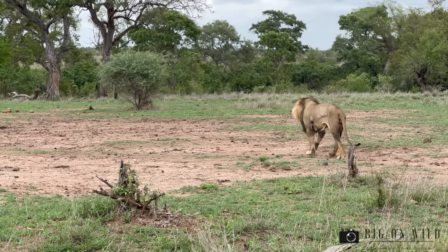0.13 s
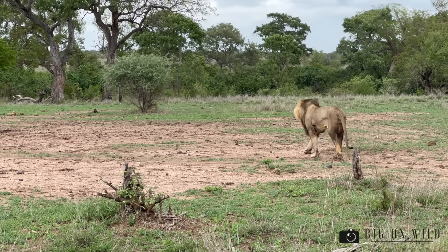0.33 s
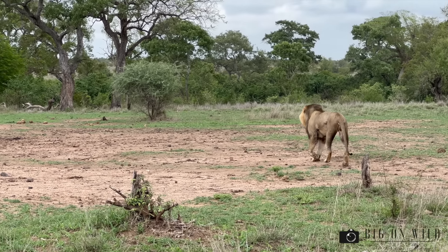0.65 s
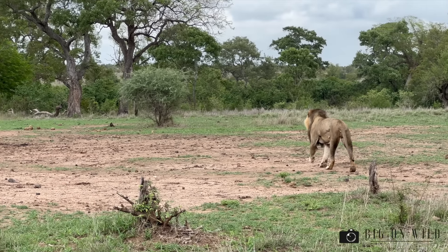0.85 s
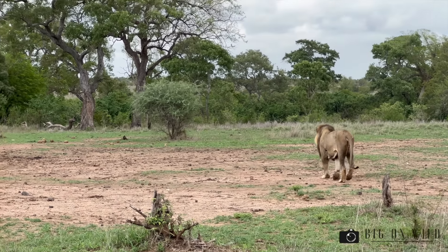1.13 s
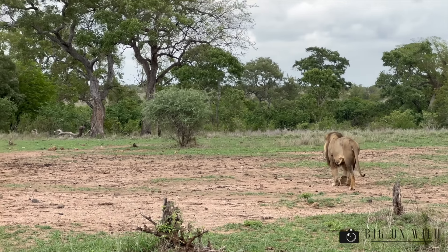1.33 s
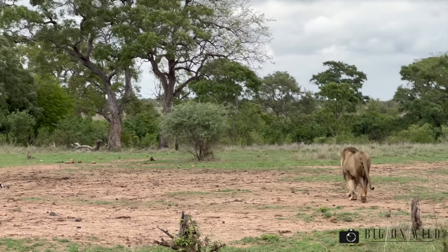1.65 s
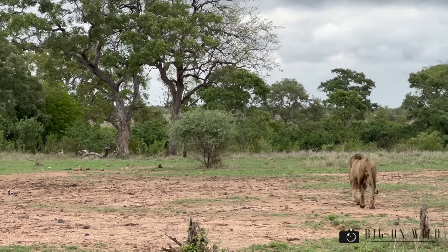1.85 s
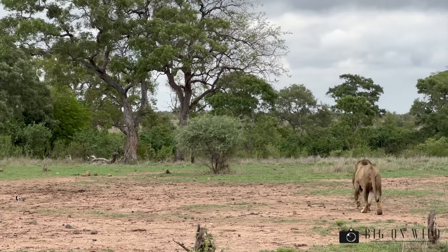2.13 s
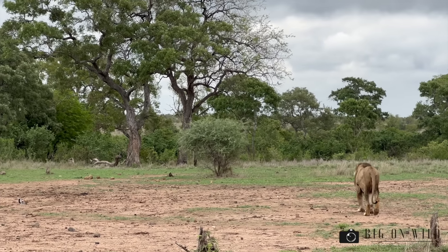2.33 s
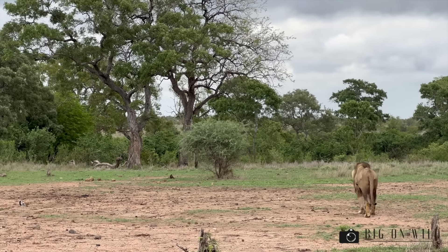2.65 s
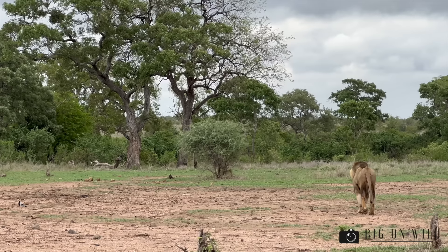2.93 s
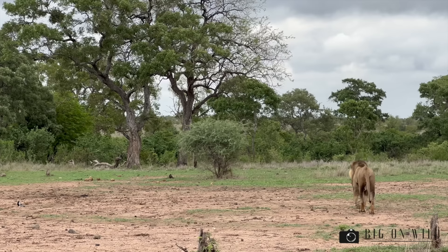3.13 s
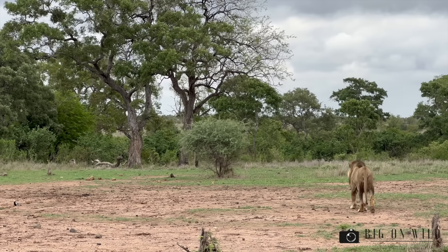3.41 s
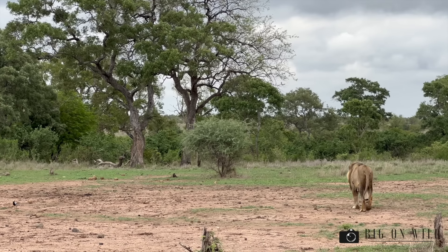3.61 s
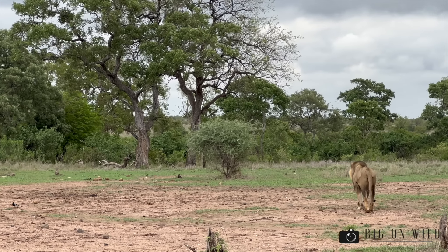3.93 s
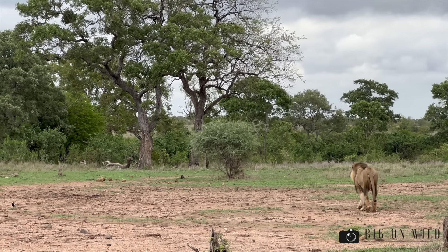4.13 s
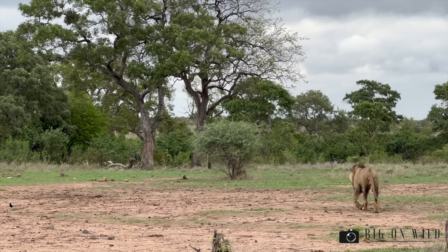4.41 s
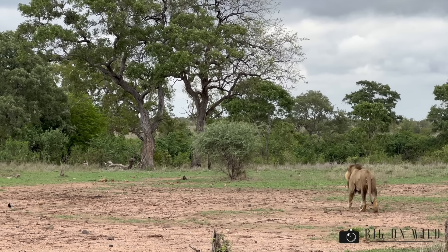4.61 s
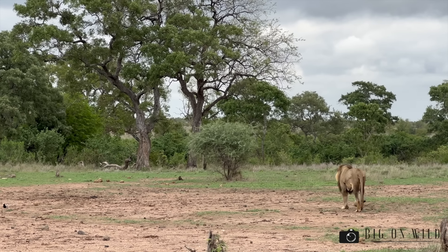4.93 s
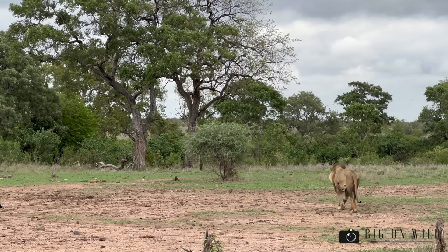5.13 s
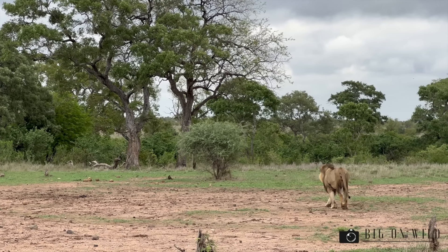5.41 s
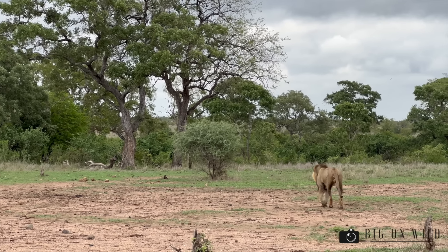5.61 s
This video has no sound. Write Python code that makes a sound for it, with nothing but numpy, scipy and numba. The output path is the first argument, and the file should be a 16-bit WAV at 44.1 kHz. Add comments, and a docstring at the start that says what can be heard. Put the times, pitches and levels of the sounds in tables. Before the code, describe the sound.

Outdoors in still bushland, a lion's heavy moan opens and drops into torn, fluttering growl. Small birds pipe, slur and scratch softly around the gap. Another long roar climbs, catches, rings deep and full, then crumbles. Three brief, hoarse, chesty grunts come with quiet spaces between. The stereo pickup is clean, the lion slightly left, birds slightly right, with a faint spread-out return from the trees.

```python
"""Lion roaring over the bush

A male lion gives two long roars, then three short grunts, in open bush country.
Each roar swells into a nearly pure deep tone, falls in pitch and breaks into a ragged growl.
Locked vocal folds give sines; loose folds give uneven clicks and torn noise, rung through throat and mouth.
Small birds, made of gliding sines and harsh stacks of partials, sing in and around the pause.
Filtered noise makes the quiet air; decaying noise and a few delays make the faint echo from the trees."""
import sys
import numpy as np
from scipy import signal
from scipy.fft import rfft, irfft
from scipy.io import wavfile
from scipy.ndimage import uniform_filter1d
from numba import njit

SR = 44100
rng = np.random.default_rng(int(sys.argv[2]) if len(sys.argv) > 2 else 0)


def int16_out(signal):
    """Quantize to a 16-bit WAV file."""
    q = np.round(np.clip(np.atleast_2d(signal).T, -1, 1) * 32767)
    wavfile.write(sys.argv[1], SR, q.astype(np.int16))


N = 254016
TIME = np.arange(N) / SR


def from_db(db):
    """Decibels to gain."""
    return 10 ** (np.asarray(db) / 20)


def rms_one(x):
    """Scale to an rms of one."""
    return x / np.sqrt(np.mean(x ** 2) + 1e-20)


def evened(x):
    """Take out slow swells, keep the fast grain."""
    size = int(.022 * SR)
    power = uniform_filter1d(uniform_filter1d(x ** 2, size), size)
    return x / np.sqrt(np.abs(power) + 1e-12)


def lowpass(x, hz):
    """Gentle second-order low-pass."""
    return signal.sosfilt(signal.butter(2, hz, fs=SR, output="sos"), x)


def drift(rate):
    """Smooth chance with spread one, changing about rate times a second."""
    return rms_one(lowpass(rng.standard_normal(N + SR), rate)[SR:])


def coloured(x, points):
    """Filter by a curve of f/Hz, level/dB, drawn straight over log frequency."""
    hz, db = np.transpose(points)
    bins = np.maximum(np.arange(N // 2 + 1) * SR / N, 1)
    return irfft(rfft(x) * from_db(np.interp(np.log(bins), np.log(hz), db)), N)


def resonate(x, modes):
    """Parallel resonances, each applied twice so that the skirts are steep."""
    out = 0
    for k, (hz, width, db) in enumerate(modes):
        r = np.exp(-np.pi * width / SR)
        section = [(1 - r * r) / 2, 0, -(1 - r * r) / 2, 1, -2 * r * np.cos(2 * np.pi * hz / SR), r * r]
        out = out + (-1) ** k * from_db(db) * signal.sosfilt([section, section], x)
    return out


def plateau(start, hold, rise, fall, rise_curve=1, fall_curve=1):
    """Rise to one at the start, hold, fall back to zero."""
    up = np.clip(1 + (TIME - start) / rise, 0, 1)
    down = np.clip(1 - (TIME - start - hold) / fall, 0, 1)
    return up ** rise_curve * down ** fall_curve


def note_shape(start, length):
    """A rounded swell of height one."""
    return np.sqrt(np.maximum(np.sin(np.pi * np.clip((TIME - start) / length, 0, 1)), 0))


def glide(start, length, from_hz, to_hz, waver):
    """One swelling sine that slides in pitch."""
    hz = np.interp(TIME, [start, start + length], [from_hz, to_hz]) * waver
    return note_shape(start, length) ** 2 * np.sin(2 * np.pi * np.cumsum(hz) / SR)


# colour of the still air over the bush: f/Hz, relative level/dB
AIR_COLOUR = [(20, -5), (55, 0), (130, -9), (330, -14.5), (550, -27), (2000, -25.5), (4000, -36),
              (14000, -29.5)]


def air():
    """Quiet outdoor noise: coloured white noise at an rms of one."""
    return rms_one(coloured(rng.standard_normal(N), AIR_COLOUR))


def far_life(pip_hz=1545, pip_db=-83, droop_hz=25, whine_hz=12920, whine_db=-84):
    """Distant drooping pips from 3.2 s on, and a thin whine of narrow noise throughout."""
    beat = 2 * np.pi * 15.7 * TIME + drift(2)
    hz = pip_hz + droop_hz * (np.cos(beat) + drift(49))
    pip_shape = np.maximum(np.sin(beat), 0) ** 2 * (TIME > 3.2)
    pips = 2 * pip_shape * np.sin(2 * np.pi * np.cumsum(hz) / SR)
    whine = rms_one(resonate(rng.standard_normal(N), [(whine_hz, 160, 0)]))
    return from_db(pip_db) * pips + from_db(whine_db) * whine


# returns from bushes and the tree line, before the tree colour: delay t/s, level/dB
ECHOES = [(.31, -39.5), (0.501, -48), (1.109, -58)]
# colour of the return from the trees: f/Hz, level/dB
TREE_COLOUR = [(70, 1.5), (300, 0), (500, -7), (1000, 10.5), (5000, -13)]


def bush(x, near_db=-29, far_db=-40, near_t60=.3, far_t60=3.2):
    """Scatter from nearby ground and scrub as short decaying noise, then a long return from the trees."""
    near = rng.standard_normal(N) * from_db(-60 * TIME / near_t60) * (TIME > .01)
    near = from_db(near_db) * near / np.linalg.norm(near)
    far = rng.standard_normal(N) * from_db(-60 * TIME / far_t60) * (TIME > .08)
    far = from_db(far_db) * far / np.linalg.norm(far)
    for delay, db in ECHOES:
        far[int(delay * SR)] += from_db(db)
    return signal.fftconvolve(x, near + coloured(far, TREE_COLOUR))[:N]


# short falling bird notes: t/s, start f/Hz, level/dB before the whistle trim
SLURS = [(1.469, 2740, -55.5), (1.677, 2532, -58.5), (2.168, 2588, -57.5), (2.381, 2465, -58.5),
         (2.593, 2490, -57.5)]
SLUR_S, SLUR_FALL = .056, 0.052   # length, share of the pitch lost
# short gliding bird notes: t/s, length t/s, start f/Hz, end f/Hz, level/dB before the whistle trim
CHIRPS = [(0.865, 0.065, 2870, 1912, -68.5), (0.952, 0.046, 3360, 3454, -64.5),
          (1.315, 0.019, 2680, 3130, -62), (2.009, 0.024, 2550, 3035, -67.5)]
# one long held note: t/s, length t/s, start f/Hz, end f/Hz
HELD_NOTE = (.919, .44, 2600, 2565)
HELD_DB = -72.5   # before the whistle trim


def whistles(waver, trim_db=1.5):
    """Slurs, chirps and one held note, each a sine that slides and swells."""
    slurs = [(start, SLUR_S, hz, hz * (1 - SLUR_FALL), db) for start, hz, db in SLURS]
    notes = slurs + CHIRPS + [(*HELD_NOTE, HELD_DB)]
    return sum(from_db(db + trim_db) * glide(*note, waver) for *note, db in notes)


PIPE_START_S, PIPE_EVERY_S, PIPE_S, PIPE_TOP_S = 1.375, .29, 0.23, .085
PIPE_TOP_HZ, PIPE_SAG_HZ, PIPE_DB = 2840, 407, -71


def piping_note(start, waver):
    """A soft whistle that arches gently and sinks."""
    from_top = np.minimum(np.abs(TIME - start - PIPE_TOP_S) / PIPE_S, 1)
    hz = (PIPE_TOP_HZ - PIPE_SAG_HZ * from_top ** 1.5) * waver
    return note_shape(start, PIPE_S) ** 2 * np.sin(2 * np.pi * np.cumsum(hz) / SR)


def piping(waver, count=4):
    """One bird repeats the same note at an even pace."""
    return from_db(PIPE_DB) * sum(piping_note(PIPE_START_S + k * PIPE_EVERY_S, waver) for k in range(count))


# share of the pitch lost, its jitter, spread of the partials in octaves
CHATTER_SAG, CHATTER_ROUGHNESS, CHATTER_OCTAVES = .1, .075, .55
# a thin high edge on each note
CHATTER_EDGE_HZ, CHATTER_EDGE_DB, CHATTER_EDGE_OCTAVES = 7000, -15, .17


def harsh_note(start, length, hz, bright_hz, jitter, count=10):
    """A scratchy falling stack of partials, strongest around one pitch."""
    at = np.flatnonzero((TIME >= start) & (TIME < start + length))
    along = (TIME[at] - start) / length
    bend = 1 - CHATTER_SAG * (along - .5) + CHATTER_ROUGHNESS * jitter[at]
    turn = 2 * np.pi * np.cumsum(hz * bend) / SR
    humps = [(bright_hz, CHATTER_OCTAVES, 0), (CHATTER_EDGE_HZ, CHATTER_EDGE_OCTAVES, CHATTER_EDGE_DB)]
    stack = 0
    for k in range(2, count + 1):
        for centre, octaves, db in humps:
            strength = from_db(db) * np.exp(-(np.log2(k * hz / centre) / octaves) ** 2)
            stack = stack + strength * np.sin(k * turn)
    out = np.zeros(N)
    out[at] = rms_one(stack) * np.sin(np.pi * along)
    return out


# harsh bird notes: t/s, length t/s, pitch f/Hz, brightest f/Hz, level/dB before flutter and swell
CHATTER = [(0.887, 0.028, 783, 3570, -72), (0.961, 0.066, 716, 3300, -69), (1.069, 0.041, 760, 2100, -68),
           (1.138, 0.041, 696, 2526, -68.5), (1.228, 0.05, 814, 2752, -66.5),
           (1.322, 0.068, 753, 2419, -65), (1.839, 0.06, 713, 3700, -69), (1.885, 0.034, 706, 2238, -69.5),
           (1.943, 0.03, 781, 2440, -72.5), (2.027, 0.048, 767, 2340, -68)]


def chatter():
    """Scratchy notes whose pitch jitters fast and whose level flutters."""
    jitter, flutter = drift(500), from_db(3 * drift(150))
    return flutter * sum(from_db(db) * harsh_note(*note, jitter) for *note, db in CHATTER)


def birds():
    """Sliding whistles, a run of even piping and scratchy notes; the whistled pitches share one waver."""
    waver = 1 + 0.003 * drift(120)
    return whistles(waver) + piping(waver) + chatter()


GRUNT_ARCH_S = .115


def grunt_arch(top):
    """The rounded rise and fall of tension in a grunt."""
    return np.exp(-((TIME - top) / GRUNT_ARCH_S) ** 2)


# pitch of each roar, before the wobble: t/s, f/Hz
FIRST_ROAR_PITCH = [(0.0, 158.6), (0.074, 151.5), (0.2, 149.3), (0.264, 165.2), (0.348, 195.8),
                    (0.546, 158.1), (0.678, 152.3), (0.7, 148.4)]
SECOND_ROAR_PITCH = [(2.2, 108.9), (2.266, 130.2), (2.337, 158.4), (2.4, 159.5), (2.46, 168.9),
                     (2.501, 189.6), (2.57, 199.6), (2.705, 182.1), (2.77, 166.7), (2.99, 143.7),
                     (3.06, 134.9)]
# each grunt is a small arch of pitch, before the wobble: top t/s, top f/Hz
GRUNT_PITCH = [(3.9, 142.8), (4.775, 140.6), (5.76, 134.3)]
SLACK_HZ, SLACKEN_S = 105.63, .06   # after a roar the pitch sinks to that of slack folds
ATTACK_S, ATTACK_CURVE = .1, 2.6   # every cry swells alike


def voice_pitch():
    """Roars follow their arches and then slacken; each grunt rises from slack and sinks back."""
    pitch = np.zeros(N)
    for curve in (FIRST_ROAR_PITCH, SECOND_ROAR_PITCH):
        s, hz = np.transpose(curve)
        tension = np.exp(-np.maximum(TIME - s[-1], 0) / SLACKEN_S)
        roar = SLACK_HZ + (np.interp(TIME, s, hz) - SLACK_HZ) * tension
        pitch = np.where(TIME >= s[0] - 2 * ATTACK_S, roar, pitch)
    return pitch + sum((hz - SLACK_HZ) * grunt_arch(s) for s, hz in GRUNT_PITCH)


# pushes of breath, first roar (six), second roar (five), then three grunts:
# full voice t/s, held t/s, effort level/dB, extra rasp level/dB
CRIES = [(0.0, 0.28, -10, 10), (.28, 0.062, -4, -2.5), (0.348, 0.4, 0.5, 0), (.70, .025, -1, 0),
         (.78, 0.028, -4.5, 2), (.91, .025, -19.5, -2), (2.26, 0.24, -1.5, 2.5), (2.54, .49, 0.5, -.5),
         (3.059, 0.05, -0.5, 2), (3.135, .008, -6.5, 2), (3.24, 0.03, -24, -4.5), (3.855, 0.085, -2, 1.5),
         (4.718, .15, 0, 2), (5.729, .15, 1.5, -2.5)]
RELEASE_DB_PER_S, RELEASE_S, RELEASE_CURVE = 140, .23, .8   # each push dies away until the air is spent


def breath_pushes():
    """Effort of every push: a curved swell, a hold, and a fall that is steep in decibels."""
    pushes = []
    for start, hold, db, _ in CRIES:
        fallen_db = RELEASE_DB_PER_S * np.maximum(TIME - start - hold, 0)
        shape = plateau(start, hold, ATTACK_S, RELEASE_S, ATTACK_CURVE, RELEASE_CURVE)
        pushes.append(from_db(db - fallen_db) * shape)
    return np.array(pushes)


# the folds lock into a clean tone: t/s, length t/s, firmness 0-1
LOCKS = [(0.0, .37, .93), (.39, .285, 1), (.785, .03, .35), (2.326, .23, .85), (2.54, .46, .96),
         (3.09, .02, .2), (3.865, .005, .3), (3.925, .005, .45), (4.755, .04, .85), (4.85, .015, .45),
         (5.755, .06, .6)]
LOCK_S, LOCK_SHARE, UNLOCK_S = 0.035, 0.083, 0.049


def fold_lock():
    """The folds settle into a clean tone, more slowly for a long one, then fall out of it."""
    return np.max([firm * plateau(start, hold, LOCK_S + LOCK_SHARE * hold, UNLOCK_S)
                   for start, hold, firm in LOCKS], axis=0)


# the voice breaks into its octave: t/s, length t/s, dip of the fundamental level/dB, octave gain level/dB
BREAKS = [(0.0, .395, 16.5, 17), (2.376, .115, 9.5, 17), (2.518, 0.062, -3.5, 11), (2.596, 0.048, 4.5, 17)]
BREAK_EDGE_S, RECOVERY_CURVE = 0.029, 4.0


def octave_breaks():
    """In a break the octave jumps up and the fundamental dips, then creeps back."""
    broken, dip_db, octave_db = 0, 0, 0
    for start, length, dip, gain_db in BREAKS:
        window = plateau(start, length, BREAK_EDGE_S, BREAK_EDGE_S)
        along = np.clip((TIME - start) / length, 0, 1)
        broken = np.minimum(broken + window, 1)
        octave_db = octave_db + gain_db * window
        dip_db = dip_db + dip * window * (1 - along ** RECOVERY_CURVE)
    return broken, dip_db, octave_db


LOOSE_ROUGHNESS, LOCKED_ROUGHNESS, BREAK_ROUGHNESS = .72, .02, .07
ROUGH_FOLLOWS = .07   # exponent on effort, so low that a dying cry stays ragged
TIGHTEN_HZ_PER_S = 245   # folds that tighten this fast lose their roughness


def roughness(arch, effort, lock, unsteady):
    """Unlocked folds are rough, unless the pitch is climbing fast."""
    climb = np.maximum(np.gradient(arch) * SR, 0)
    calmed = uniform_filter1d(np.exp(-(climb / TIGHTEN_HZ_PER_S) ** 4), size=1500)
    loose = (1 - lock) ** 2 * effort ** ROUGH_FOLLOWS * calmed
    return np.clip(LOOSE_ROUGHNESS * loose + LOCKED_ROUGHNESS * lock + BREAK_ROUGHNESS * unsteady, 0, 1)


# the voice catches for an instant: t/s, dip level/dB
CATCHES = [(0.056, 4), (0.332, 6.5), (0.758, 5), (2.246, 4.5), (2.371, 7.5), (2.499, 8.5), (2.586, 10),
           (4.704, 3), (5.719, 6)]
CATCH_S = .009
WOBBLE_SHARE, STEADY_WOBBLE_SHARE, WOBBLE_HZ = .03, .007, 24   # unsteady pitch, most of all in a break
THROB_HZ, THROB_DB = 20, 3   # the voice throbs while effort is low
SURGE_DB, SURGE_HZ = 1.8, 22   # the rasp comes in uneven surges
SHUDDER_HZ, SHUDDER_DB, SHUDDER_BELOW_HZ = 30.56, 4.5, 120   # slack folds beat slowly as a cry dies
SHIMMER_DB = .6   # even locked folds vary in strength
# base levels of fundamental and octave, and what the fundamental gains by locking
TONE_DB, LOCK_GAIN_DB, OCTAVE_DB = -23, 13, -38.5
TAUT_HZ, TAUT_DB_PER_HZ, TONE_DB_PER_HZ = 175, 1.08, 0.2727   # above this, less rasp and a thinner tone
SPENT_DB = -33   # around this effort the tone fades out as the folds stop moving
# dB gained per dB of effort: the harder the push, the brighter the voice
TONE_FOLLOWS, OCTAVE_FOLLOWS, BREAK_FOLLOWS, RASP_FOLLOWS = 0.71, 0.4, 0.35, 1.164


def call_controls():
    """Effort, locking and breaks set pitch, roughness and the gains of tone, octave and rasp."""
    pushes, lock = breath_pushes(), fold_lock()
    effort = pushes.max(axis=0)
    broken, dip_db, octave_db = octave_breaks()
    unsteady = (1 - from_db(-dip_db)) ** 2
    arch = voice_pitch()
    pitch = arch * (1 + (STEADY_WOBBLE_SHARE + WOBBLE_SHARE * unsteady) * drift(WOBBLE_HZ))
    rough = roughness(arch, effort, lock, unsteady)

    catch = from_db(-sum(db * np.exp(-((TIME - s) / CATCH_S) ** 2) for s, db in CATCHES))
    throb = catch * from_db(-THROB_DB * np.maximum(1 - effort, 0) * np.cos(2 * np.pi * THROB_HZ * TIME))
    surge = from_db(SURGE_DB * drift(SURGE_HZ))
    slackness = np.clip((SHUDDER_BELOW_HZ - arch) / (SHUDDER_BELOW_HZ - SLACK_HZ), 0, 1)
    shudder_db = SHUDDER_DB * slackness * np.cos(2 * np.pi * SHUDDER_HZ * TIME)
    shake = from_db(shudder_db + SHIMMER_DB * drift(SHUDDER_HZ / 2))

    thinning_db = TONE_DB_PER_HZ * np.maximum(pitch - TAUT_HZ, 0)
    tone = from_db(TONE_DB + LOCK_GAIN_DB * lock - dip_db - thinning_db)
    voiced = effort ** 2 / (effort ** 2 + from_db(SPENT_DB) ** 2)
    tone = tone * shake * catch * voiced * effort ** TONE_FOLLOWS * surge ** (1 - lock) + 1e-9
    octave_follows = OCTAVE_FOLLOWS * (1 - broken) + BREAK_FOLLOWS * broken
    octave = throb * from_db(OCTAVE_DB + octave_db) * effort ** octave_follows
    push_rasps = [from_db(extra_db) * push ** RASP_FOLLOWS for (*_, extra_db), push in zip(CRIES, pushes)]
    rasp = throb * surge * np.max(push_rasps, axis=0)
    return pitch, effort, rough, tone, octave, rasp


def pulses(cycles):
    """One click at the end of every cycle, shared between the two nearest samples."""
    at = np.flatnonzero(np.diff(np.floor(cycles)) > 0)
    late = (np.floor(cycles[at + 1]) - cycles[at]) / (cycles[at + 1] - cycles[at])
    out = np.zeros(N)
    out[at] += 1 - late
    out[at + 1] += late
    return rms_one(out)


def flapping(flaps, depth_db):
    """Each flap lets a sudden gust through that then dies down."""
    return from_db(-depth_db * (flaps % 1))


HOARSENESS = .22   # even locked folds leak air


def vocal_folds(pitch, rough, twice, cycles, flap_hz=50, flap_db=13, slack_hz=160, soft_hz=1050, leak=0.78):
    """Folds slap shut once or twice a cycle, while loose flapping tissue chops the leaking air."""
    # slack folds at low pitch close unevenly and leak more air
    slack = np.minimum((slack_hz / pitch) ** 7, 2) * (1 - twice) + rough
    closures = cycles + (.008 + .011 * slack) * drift(70)
    slaps = (pulses(closures) + .5 * twice * pulses(closures + .5)) * from_db(2 * drift(64))
    flaps = np.cumsum(flap_hz * from_db(2 * drift(35))) / SR
    breath = rng.standard_normal(N) * (1 + .5 * np.cos(2 * np.pi * cycles))
    torn_air = evened(breath * flapping(flaps, flap_db * (.5 + rough)))
    flow = lowpass(slaps, soft_hz) + leak * (HOARSENESS + slack) * torn_air
    shudder = pulses(flaps) + torn_air
    return slaps, torn_air, flow, shudder


@njit
def moving_resonance(x, angle, r):
    """One resonance whose centre may change at every sample."""
    out = np.zeros(len(x))
    for i in range(2, len(x)):
        out[i] = (1 - r * r) / 2 * (x[i] - x[i - 2]) + 2 * r * np.cos(angle[i]) * out[i - 1] - r * r * out[i - 2]
    return out


WANDER_SHARE, WANDER_DB, WANDER_HZ = 0.022, 3.5, 11   # the resonances never stand still


def tract(x, modes, stretch=1, opening=1):
    """Steep soft-tissue resonances stretch and wander; the upper ones fade as the opening narrows."""
    out = 0
    for k, (hz, width, db) in enumerate(modes):
        centre_hz = hz * stretch * (1 + WANDER_SHARE * drift(WANDER_HZ))
        angle = 2 * np.pi * centre_hz / SR
        r = np.exp(-np.pi * width / SR)
        ring = moving_resonance(moving_resonance(x, angle, r), angle, r)
        out = out + (-opening) ** k * from_db(db + WANDER_DB * drift(WANDER_HZ)) * ring
    return evened(out)


# deep resonance of the growl: f/Hz, width f/Hz, level/dB
GROWL = [(119.4, 62, 0)]


def chest_voice(turn, pitch, rough, tone, shudder, rumble_db=-7):
    """A sine at the pitch gives way to growl and rumble: the flaps shake the chest, deepest at low pitch."""
    clean = np.sqrt(2 * (1 - rough ** 2)) * np.sin(turn)
    growl = tract(shudder, GROWL, np.sqrt(pitch / SHUDDER_BELOW_HZ))
    sinking = np.minimum(143 / pitch, 1) ** 14
    rumble = from_db(rumble_db) * sinking * evened(resonate(shudder, [(77.4, 16, 0)]))
    return tone * (clean + rough * (growl + np.sqrt(rough) * rumble))


# croak at the top of each grunt: f/Hz, width f/Hz, level/dB
CROAK = [(186, 52, 0), (317.4, 50, 2)]


def grunt_croak(rasp, shudder, croak_db=-25):
    """The shaking flaps ring low at the top of each grunt."""
    grunting = sum(grunt_arch(s) for s, _ in GRUNT_PITCH) ** 2
    return from_db(croak_db) * rasp * grunting * tract(shudder, CROAK)


def octave_voice(turn, octave, twice):
    """A sine at twice the pitch, unsteady in phase and strength."""
    wave = evened(np.sin(2 * turn + (1.2 - .75 * twice) * drift(45)))
    return octave * wave * from_db(2.2 * drift(35) - .5)


# resonances of the long throat: f/Hz, width f/Hz, level/dB
THROAT = [(331.8, 58, 11), (464, 110, -2), (578, 60, -4.5)]
JAW_FOLLOWS = 0.27   # the jaw opens as the pitch climbs
CLOSING_FOLLOWS = 1   # the throat's upper resonances close as the effort fades


def throat_rasp(pitch, effort, rasp, twice, flow, torn_air, rasp_db=-31):
    """Slaps and leaking air ring in the long throat."""
    jaw = (pitch / TAUT_HZ) ** JAW_FOLLOWS
    gain = from_db(rasp_db) * rasp / (effort + .02) ** .3 * (1 - .5 * twice)
    return gain * tract(flow + .2 * torn_air, THROAT, jaw, effort ** CLOSING_FOLLOWS * jaw ** 4)


# high resonances of the snarl: f/Hz, width f/Hz, level/dB
SNARL = [(1830, 730, 9), (2270, 750, 0), (3160, 780, -21.5), (4500, 3900, -31.5), (6960, 1800, -29.5)]
SNARL_FOLLOWS = .3   # further dB per dB of effort


def snarl(effort, rough, rasp, flow, snarl_db=-64, snarl_rough_db=8):
    """The flow, with more noise the rougher it is, rings high."""
    gain = from_db(snarl_db + snarl_rough_db * rough) * rasp * effort ** SNARL_FOLLOWS
    return gain * tract(flow + rough * rng.standard_normal(N), SNARL)


# resonances of the open mouth: f/Hz, width f/Hz, level/dB
MOUTH = [(755, 65, 3), (857, 36, -3), (1038, 92, 0.5), (1231, 170, -8)]


def open_mouth(effort, rasp, twice, flow, mouth_db=-51.0):
    """The flow rings in the mouth, more with a harder push."""
    return from_db(mouth_db) * rasp * np.sqrt(effort) * (1 - twice) * tract(flow, MOUTH)


# nasal ring of the taut voice: f/Hz, width f/Hz, level/dB
NASAL = [(885, 90, 0)]


def nasal_ring(rasp, twice, taut, slaps, nasal_db=-50):
    """The slaps of taut folds ring in the nose."""
    return from_db(nasal_db) * rasp * (1 - twice) * np.minimum(4 * (1 - taut), 1) * tract(slaps, NASAL)


# bright resonances that ring in the moan: f/Hz, width f/Hz, level/dB
MOAN_BUZZ = [(560, 56, 26.5), (900, 49, 7.5), (1680, 33, -10.5)]


def moan_buzz(effort, octave, twice, slaps, torn_air, buzz_db=-19):
    """Twice-closing folds buzz brightly in the moan."""
    gain = from_db(buzz_db) * octave * twice * np.sqrt(effort)
    return gain * tract(slaps + .1 * torn_air, MOAN_BUZZ)


# resonances of the airy hiss: f/Hz, width f/Hz, level/dB
AIRY = [(3940, 3200, -2), (7100, 870, -5.5)]


def airy_hiss(turn, rough, rasp, airy_db=-74):
    """Air squeezed between locked folds hisses once a cycle."""
    squeezed = resonate(rng.standard_normal(N) * (1 + 0.73 * np.cos(turn)), AIRY)
    return from_db(airy_db) * np.sqrt(rasp) * (1 - rough) * rms_one(squeezed)


# thin gliding squeaks within the second roar: t/s, length t/s, start f/Hz, end f/Hz, level/dB
SQUEAKS = [(2.241, 0.062, 1124, 1389, -47), (2.857, 0.069, 1461, 1192, -49.5)]


def squeaks():
    """Brief sines slide up and down with a fast waver."""
    return sum(from_db(db) * glide(*note, 1 + 0.02 * drift(200)) for *note, db in SQUEAKS)


def thin_ring(loudness, ring_db=-67):
    """A very faint high ring of narrow noise follows the level of the deep tone."""
    ring = resonate(rng.standard_normal(N), [(9446, 28, 0), (9754, 40, -1)])
    return from_db(ring_db) * loudness * rms_one(ring)


def lion(jitter=.09):
    """Heavy vocal folds: a clean tone when they lock, uneven slaps and torn air when they do not."""
    pitch, effort, rough, tone, octave, rasp = call_controls()
    cycles = np.cumsum(pitch * (1 + jitter * rough * drift(60))) / SR
    turn = 2 * np.pi * cycles
    # in the moan the folds close a second time in each cycle, so the even harmonics lead
    twice = octave ** 2 / (octave ** 2 + tone ** 2)
    taut = from_db(-TAUT_DB_PER_HZ * np.maximum(pitch - TAUT_HZ, 0))
    slaps, torn_air, flow, shudder = vocal_folds(pitch, rough, twice, cycles)

    deep = chest_voice(turn, pitch, rough, tone, shudder) + grunt_croak(rasp, shudder)
    deep = deep + octave_voice(turn, octave, twice)
    harsh = throat_rasp(pitch, effort, rasp, twice, flow, torn_air) + snarl(effort, rough, rasp, flow)
    bright = open_mouth(effort, rasp, twice, flow) + nasal_ring(rasp, twice, taut, slaps)
    bright = bright + moan_buzz(effort, octave, twice, slaps, torn_air)
    thin = airy_hiss(turn, rough, rasp) + squeaks() + thin_ring(tone)
    return deep + taut * harsh + bright + thin


# how far the voice leans left: f/Hz, side against mid level/dB
LEAN = [(60, -19), (320, -11.5), (1200, -18), (3000, -27)]


def scene(air_db=-72, air_side_db=-4, echo_side_db=-6, bird_echo_db=4, bird_right_db=-14):
    """The lion leans left, most around 320 Hz, the birds a little right; echoes and air all around."""
    voice, song = lion(), birds()
    scattered = voice + from_db(bird_echo_db) * song
    mid = voice + song + bush(scattered) + far_life() + from_db(air_db) * air()
    lean = coloured(voice, LEAN) - from_db(bird_right_db) * song
    # fresh echo and air noise in the side channel spreads them wide
    side = lean + from_db(echo_side_db) * bush(scattered) + from_db(air_db + air_side_db) * air()
    return np.array([mid + side, mid - side])


CUTOFF_HZ = 15300


def record(dry):
    """The microphone drops the deepest bass; a 4 ms fade at either end keeps the edges from clicking, and the
    top is cut."""
    thinned = signal.sosfilt(signal.butter(3, 52, "high", fs=SR, output="sos"), dry)
    ramp = np.minimum(np.minimum(TIME, TIME[::-1]) / .004, 1)   # 4 ms at either end
    faded = thinned * np.sin(np.pi / 2 * ramp) ** 2
    return signal.sosfilt(signal.cheby2(12, 70, CUTOFF_HZ, fs=SR, output="sos"), faded)


dry = scene()
out = record(dry)
int16_out(out)
```